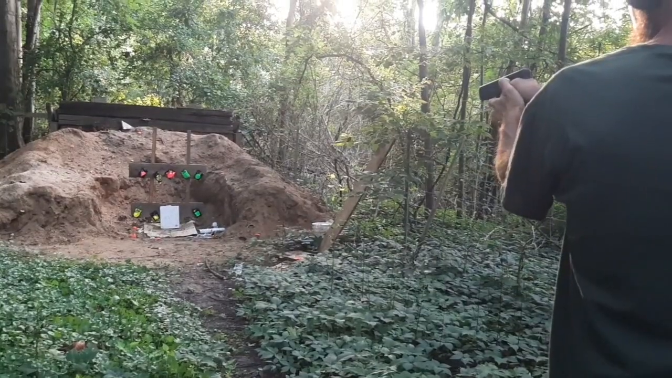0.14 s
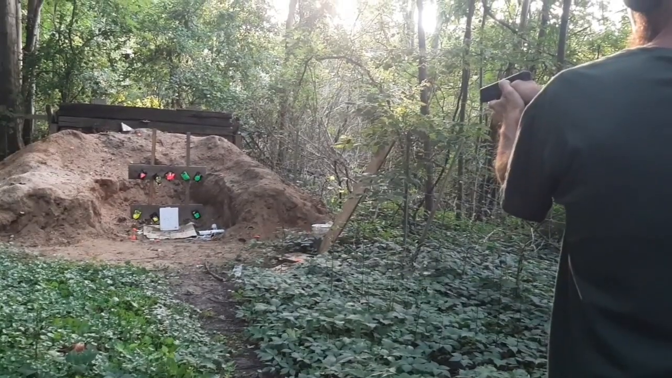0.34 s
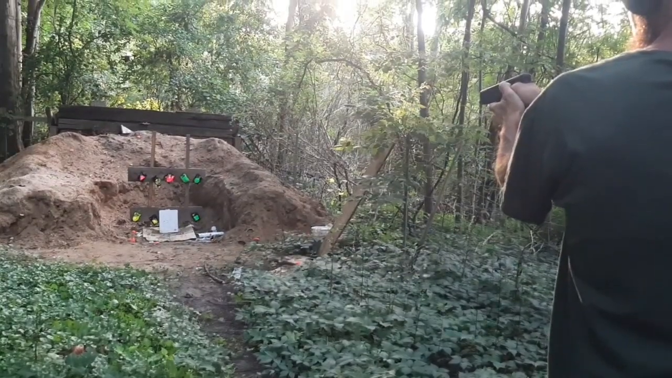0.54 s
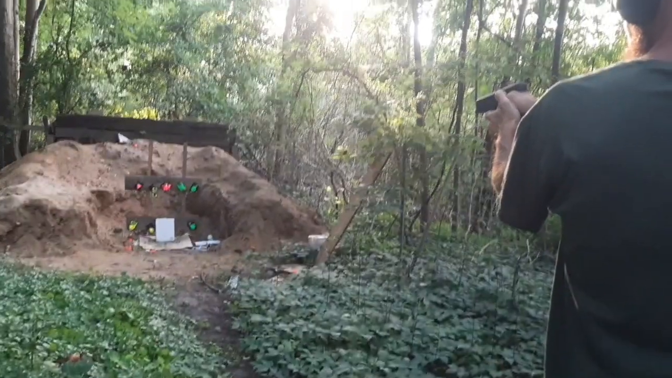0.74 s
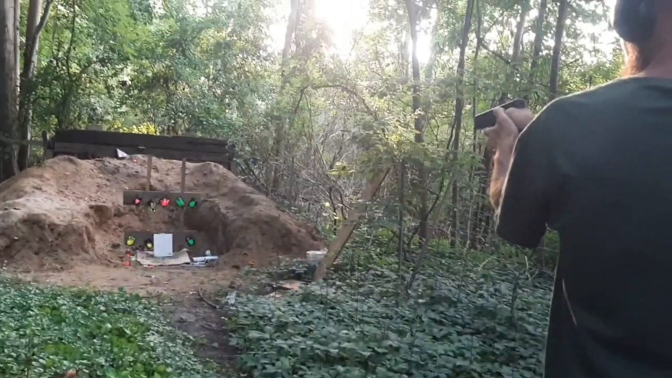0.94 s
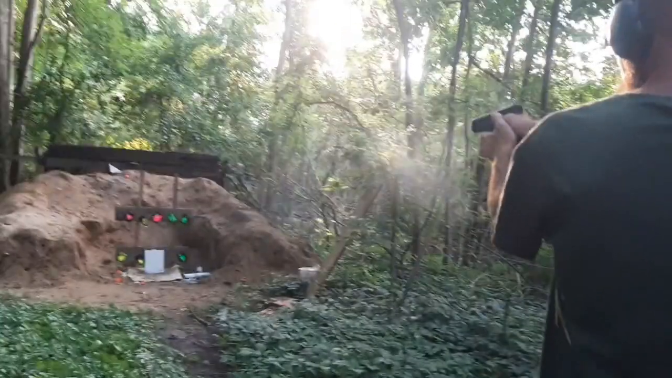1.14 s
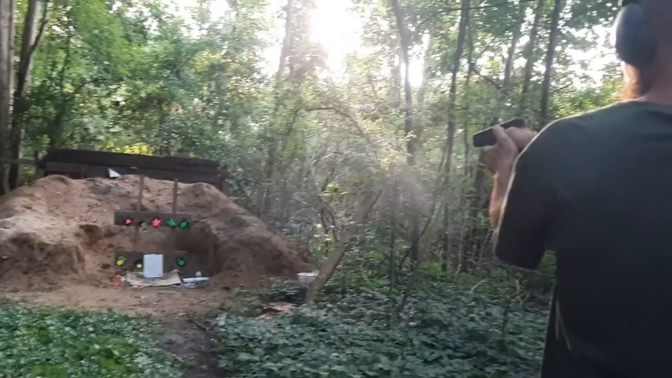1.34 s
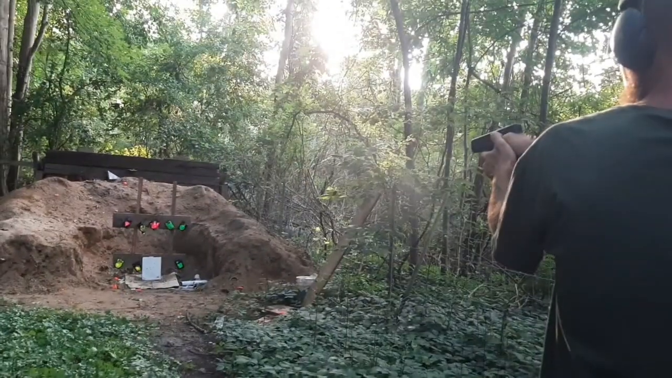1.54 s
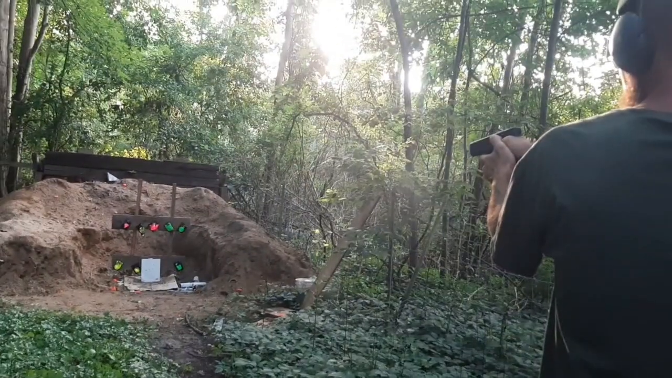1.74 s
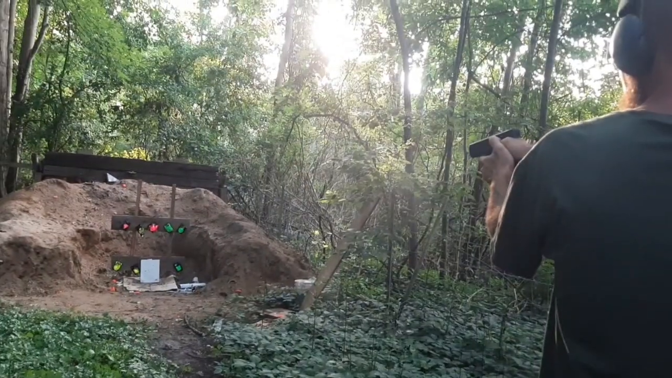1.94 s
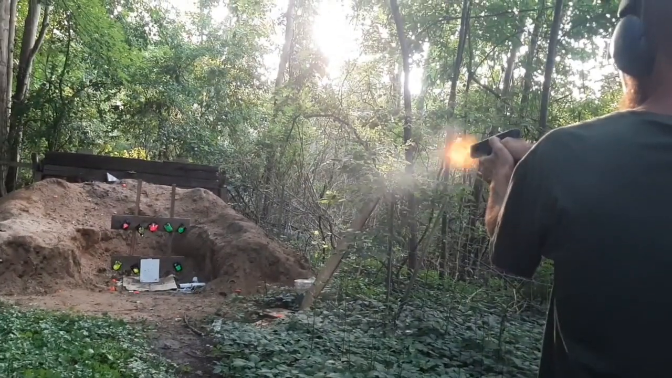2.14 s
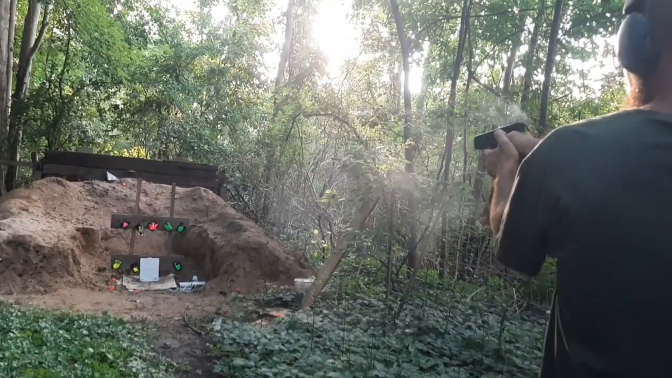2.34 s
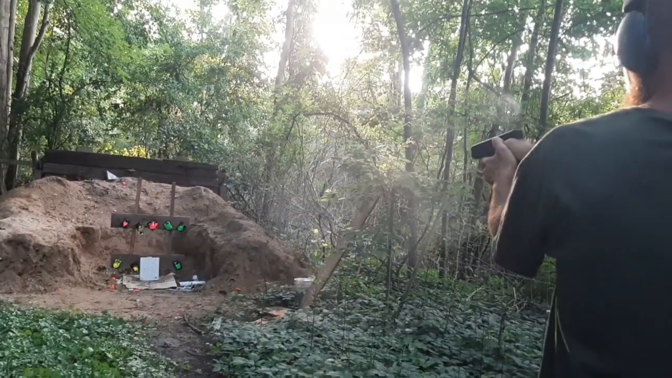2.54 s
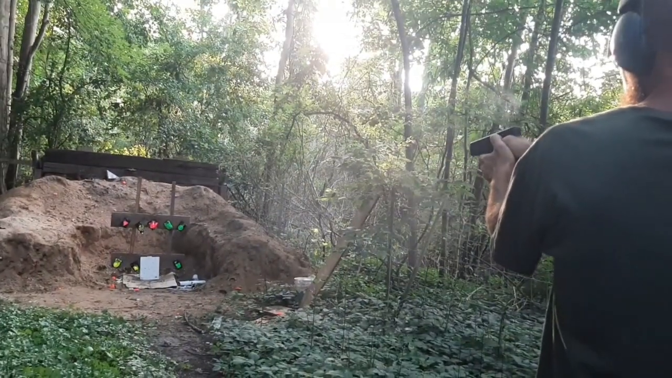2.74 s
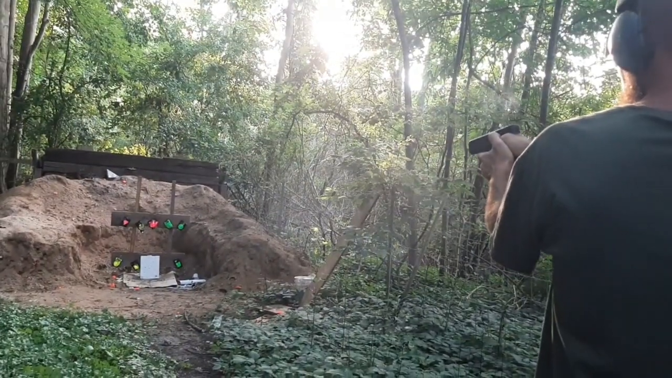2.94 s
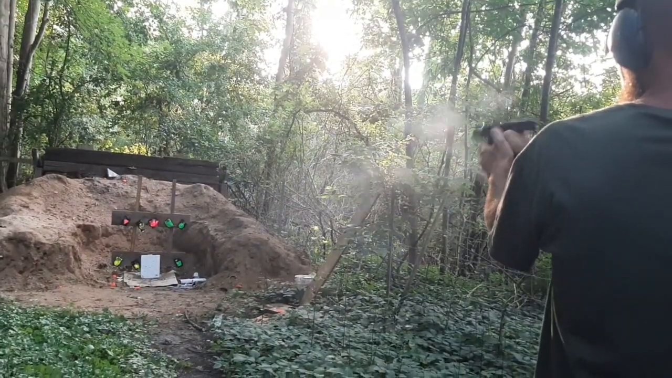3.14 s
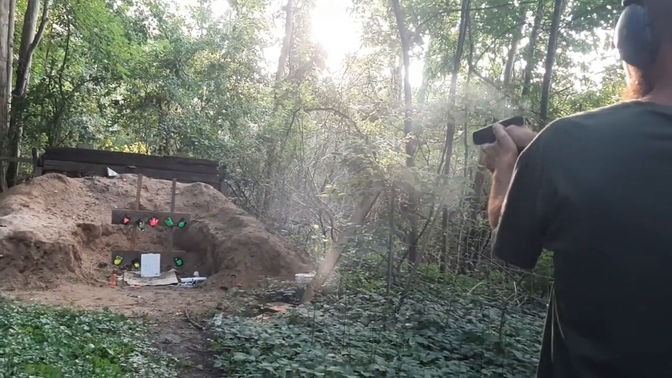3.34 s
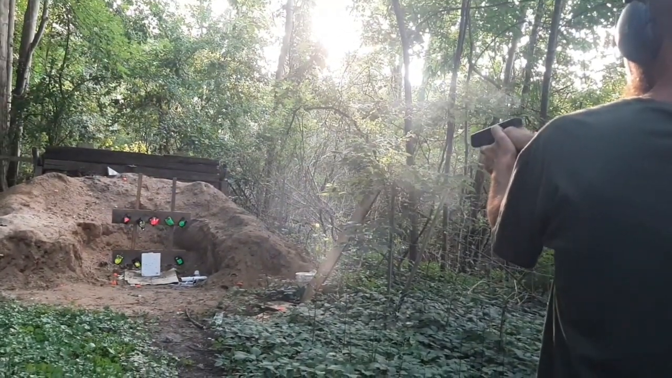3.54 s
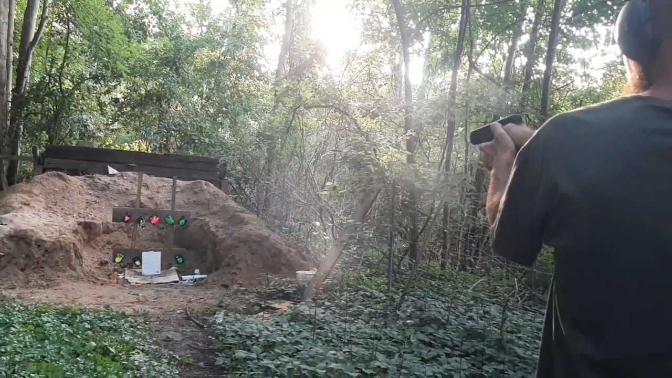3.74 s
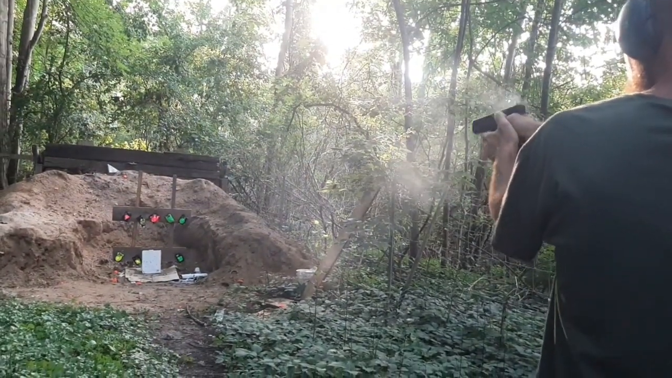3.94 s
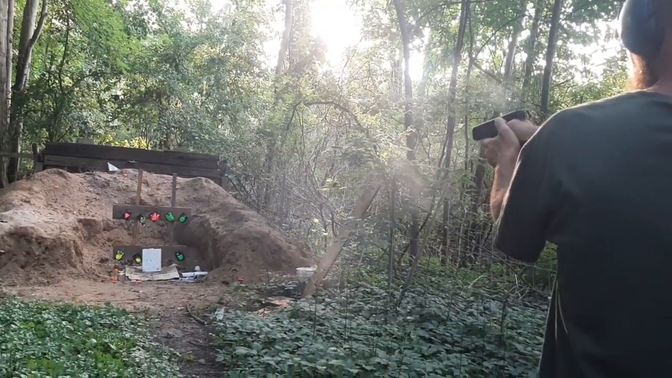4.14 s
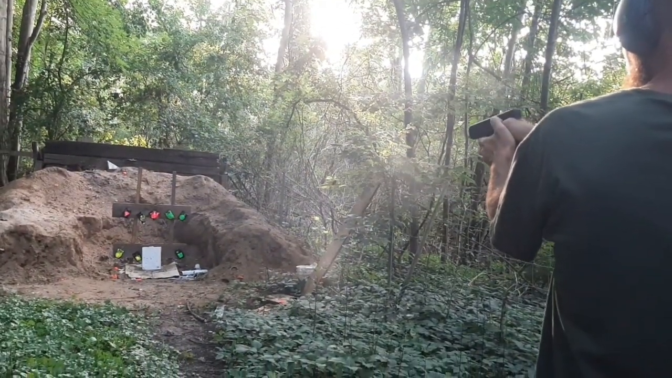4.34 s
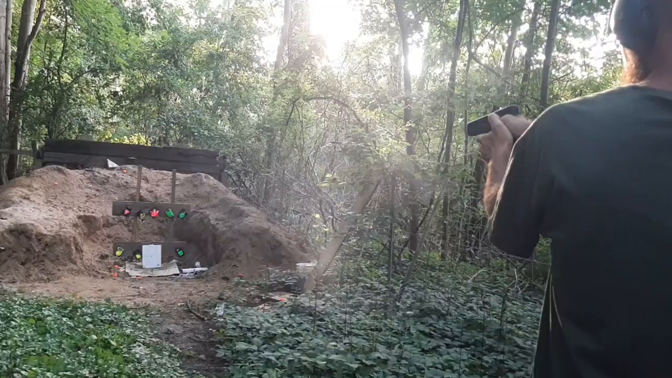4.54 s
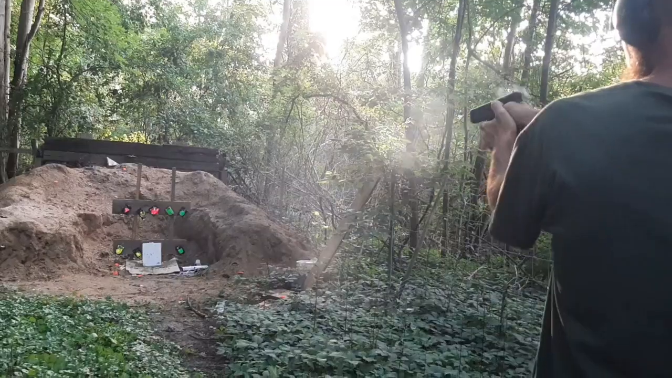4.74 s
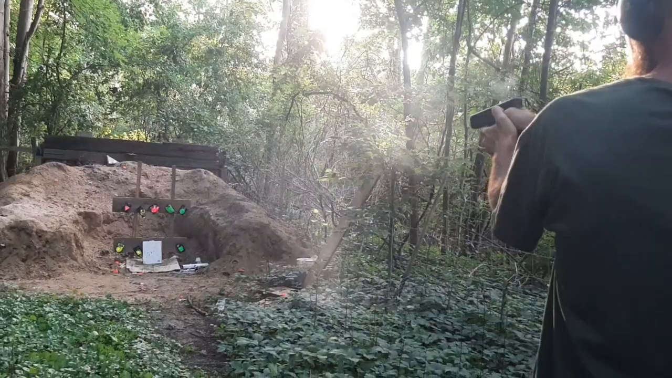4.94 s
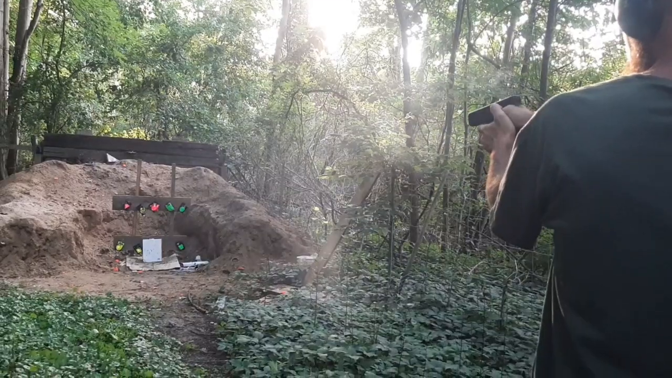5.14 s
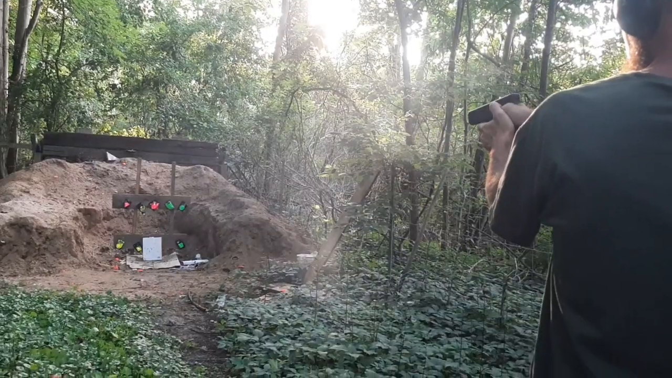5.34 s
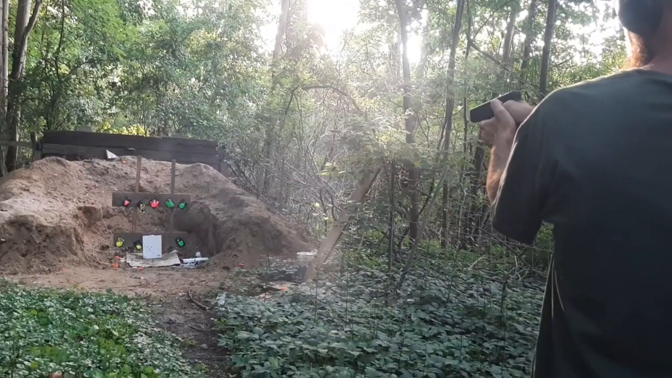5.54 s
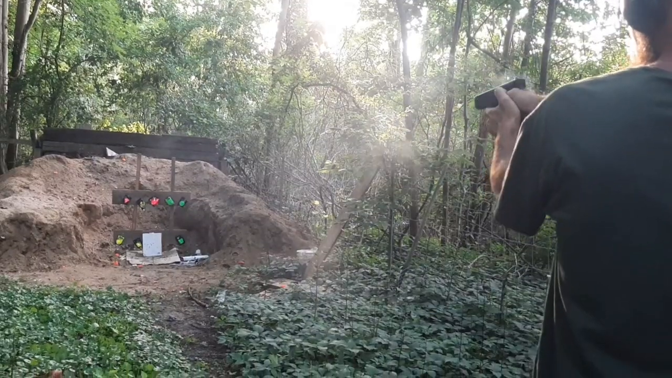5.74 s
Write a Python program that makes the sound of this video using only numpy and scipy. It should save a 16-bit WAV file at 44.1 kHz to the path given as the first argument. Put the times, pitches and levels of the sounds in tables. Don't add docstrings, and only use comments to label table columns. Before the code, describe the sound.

Six loud pistol shots at a steady pace in a wood, each clipped crack followed by a rolling echo, over faint throbbing traffic.

```python
import sys
import numpy as np
from scipy import signal
from scipy.fft import rfft, irfft, next_fast_len
from scipy.io import wavfile
from scipy.ndimage import uniform_filter1d

SR = 44100
rng = np.random.default_rng(int(sys.argv[2]) if len(sys.argv) > 2 else 0)


def nominal_scale(level):
    x = np.asarray(level, float) / 20
    return 10 ** x


def store_wav(level_fs):
    pcm = np.round(np.clip(np.atleast_2d(level_fs), -1, 1) * 32767)
    wavfile.write(sys.argv[1], SR, pcm.T.astype(np.int16))


N = 254898

# freq_hz, density_db (per Hz)
TRAFFIC_COLOUR = [(25, -17), (64, 1.5), (200, -18), (330, -17.5), (480, -15), (950, -17.5), (1300, -21.5),
                  (1750, -25), (2080, -22), (2500, -30.5), (5000, -40), (7400, -45), (8500, -62),
                  (15500, -68)]
# freq_hz, width_hz, boost_db (over the traffic)
MOTOR_HUM = [(335, 14, 6), (478, 16, 7), (690, 16, 5), (855, 14, 6), (955, 16, 7), (1530, 20, 5),
             (2060, 90, 3)]
# peak_s, swell_db, length_s
VEHICLE_PASSES = [
    (.12, 5, 0.21),
    (.9, 5, 0.54),
    (1.616, 2.5, 0.12),
    (2.8, 3.5, 0.17),
    (3.399, 2.5, .15),
    (4.094, 0.5, .15),
    (4.855, 3, .1),
    (5.254, 2.5, .3),
]
# peak_s, length_s, pitch_hz, level_db
ENGINE_DRONES = [
    (5.403, 0.24, 100.5, -44.5),
]
# start_s, level_db, pitch_hz, t60_s
CASE_RINGS = [
    (1.751, -63, 10600, .25),
    (1.988, -76, 10700, .25),
    (1.999, -78, 11500, .1),
    (2.03, -80, 10700, .2),
    (3.008, -62, 4600, .04),
]
# start_s, level_db, centre_hz
LEAF_RUSTLES = [(.7916, -20, 1800), (1.751, -70, 11000), (1.988, -47, 5200), (1.999, -61, 11500),
                (2.03, -67, 13000), (2.887, -68, 11000), (3.006, -61, 11000), (3.008, -58, 4600),
                (5.33, -68, 13500), (5.35, -68, 13500), (5.395, -68, 11000)]
# start_s, level_db, overshoot_db (of the gain control)
PISTOL_SHOTS = [
    (1.0056, 0, -7),
    (2.139, 0.5, -4.5),
    (3.1154, 0, -4.5),
    (3.8559, 0, -3),
    (4.638, 0, -4),
    (5.6235, 0, -3.5),
]
# freq_hz, density_db (per Hz)
ECHO_COLOUR = [(30, -25), (65, -8), (368, -8), (1000, -4), (1490, -4.5), (1750, -6), (2100, -3.5),
               (3500, -5), (6050, -2), (7470, -5), (8600, -9.5), (10500, -8.5), (15500, -5), (16500, -8)]
# freq_hz, left_minus_right_db
ECHO_LEAN = [(60, -14.5), (110, 6.5), (200, 1.5), (380, 3.5), (700, 2), (1290, 1.5), (2380, 1), (4400, -4),
             (8120, 5), (15000, 1)]
# freq_hz, correlation (-1 to 1)
ECHO_LIKENESS = [(50, -0.22), (130, -0.28), (260, 1), (600, 0.55), (1200, -0.014)]
# freq_hz, t60_s
ECHO_T60 = [(60, 0.6), (150, 0.71), (300, 1.06), (500, 1.54), (1000, 1.415), (2100, 1.138), (3500, 1.063),
            (6000, 1.036), (9000, 0.87), (14000, 0.45)]
# freq_hz, swell_db (over the trunks)
BANK_SWELL = [(60, 18), (170, 11.5), (400, 8), (1000, 6.5), (2500, 4), (6000, -1.5)]
# delay_s, spread_s, centre_hz, left_db, right_db
TREE_STANDS = [(0.32, 0.091, 397, 6, 8), (.07, 0.054, 1485, 3, 2.5), (.11, 0.05, 1100, -0.5, 5),
               (.11, 0.019, 2100, -1, -0.5), (0.27, 0.0096, 900, 17, 13), (0.305, 0.0062, 1740, 12, 9),
               (0.34, 0.042, 1060, 4, 6), (0.37, 0.013, 1900, 7.5, 4), (.42, .03, 780, 0, 3),
               (0.49, 0.025, 2730, 3, 6), (.55, 0.097, 320, 8, 11.5), (0.66, 0.049, 1200, 8, 9.5),
               (0.2, 0.044, 420, 4, 6.5), (0.089, 0.03, 280, 5, -2)]
# freq_hz, width_hz, gain_db_per_s, left_minus_right_db_per_s
LINGERING_BANDS = [(380, 90, 6, 0), (600, 90, 5, 0), (950, 350, 4, 0), (1700, 200, -12, 0),
                   (2140, 220, 11, 8), (12000, 3000, 0, 8), (15650, 450, -60, 0)]

TRAFFIC_DB, INSECT_HZ, INSECT_DB, HISS_DB = -26, 6500, -62, -79
BETWEEN_PASSES_DB, THROB_DB = -1.5, 1.5
FADING_DB_S = 2.5
TREBLE_FROM_DB, TREBLE_SINK_DB_S = 11, 15
CUT_HZ, CUT_DB = 223, -4
DUCK_DB, RECOVER_DB_S = -15, 2.5
RUSTLE_T60_S = 0.06
ECHO_SAMPLES = 57344
BANK_DELAY_S, BANK_SPREAD_S, BANK_SHARE = (0.068, 0.021), (0.039, 0.036), (1.09, 0.76)
OVERLOAD_S, STILL_HZ = (0.1, 0.045), 8500
STAND_OCTAVES = 0.29
LEAK_DB, SHUT_S = 8.5, 0.0037
REOPEN_DB, REOPEN_S, SETTLE_S = 9, 0.042, 0.1
THROUGH_DB, SAG_DB_S = 3, 3
BLAST_LOBE_S, BLAST_DB, BLAST_T60_S = 0.0017, -8, 0.034
LOW_HZ, TOP_HZ = 38, 15650
NOTCH_HZ, NOTCH_WIDTH_HZ = 8600, 1200


def read(table, hz):
    freq, value = np.transpose(table)
    return np.interp(np.log(np.maximum(hz, 1)), np.log(freq), value)


def level(x, db):
    return x * nominal_scale(db) / np.sqrt(np.mean(x ** 2))


def bell(x, centre, width):
    return np.exp(-((x - centre) / width) ** 2)


def bands(size, step=0.4):
    octave = np.log2(np.maximum(np.arange(size // 2 + 1) * SR / size, 1))
    return [(2 ** c, np.clip(1 - abs(octave - c) / step, 0, 1)) for c in np.arange(4.5, 15, step)]


def walk(rate):
    k = int(SR / rate)
    held = np.repeat(rng.standard_normal(N // k + 1), k)
    return uniform_filter1d(uniform_filter1d(held, k), k)[:N]


def add(out, s, x):
    i = int(s * SR)
    out[:, i:i + x.shape[1]] += x[:, :N - i]


def hiss():
    return nominal_scale(HISS_DB) * rng.standard_normal((2, N))


def insects():
    size = next_fast_len(N)
    hz = np.arange(size // 2 + 1) * SR / size
    spectrum = rfft(rng.standard_normal((2, size))) * bell(hz, INSECT_HZ, 300)
    chorus = irfft(spectrum, size)[:, :N]
    return level(chorus * nominal_scale(3.0 * walk(12)), INSECT_DB)


def traffic():
    size = next_fast_len(N)
    hz = np.arange(size // 2 + 1) * SR / size
    hum_db = sum(db * bell(hz, f, width) for f, width, db in MOTOR_HUM)
    mid, side = rfft(rng.standard_normal((2, size))) * nominal_scale(read(TRAFFIC_COLOUR, hz) + hum_db)
    pair = mid + np.clip(hz / 120, 0.3, 1) * side * np.array([[1], [-1]])
    t = np.arange(N) / SR
    bass_db = BETWEEN_PASSES_DB + sum(db * bell(t, s, length) for s, db, length in VEHICLE_PASSES)
    treble_db = FADING_DB_S * (0.5 - t)
    for s, *_ in PISTOL_SHOTS:
        treble_db = np.where(t >= s, TREBLE_FROM_DB - TREBLE_SINK_DB_S * (t - s), treble_db)
    after_first = t > PISTOL_SHOTS[0][0]
    out = 0
    for centre, weight in bands(size, step=0.875):
        high = np.clip(np.log2(centre / 200) / 2, 0, 1)
        cut_db = CUT_DB * np.exp(-np.log2(centre / CUT_HZ) ** 2 * 2) * after_first
        drift_db = (THROB_DB * (1 - high) + 1.03) * walk(12)
        gain_db = cut_db + (1 - high) * bass_db + high * treble_db + drift_db
        out = out + nominal_scale(gain_db) * irfft(pair * weight, size)[:, :N]
    return level(out * nominal_scale([[0.9], [-0.9]]), TRAFFIC_DB)


def engine_drones():
    t = np.arange(N) / SR
    return sum(nominal_scale(db) * np.exp(-((t - s) / length) ** 4) * np.sin(2 * np.pi * hz * t)
               for s, length, hz, db in ENGINE_DRONES)


def rustling_leaves():
    out, t = np.zeros((2, N)), np.arange(16384) / SR
    for s, db, hz in LEAF_RUSTLES:
        leaf = signal.butter(2, [hz / 1.6, min(hz * 1.3, 18000)], "band", fs=SR, output="sos")
        burst = signal.sosfilt(leaf, rng.standard_normal((2, len(t))))
        add(out, s, burst * nominal_scale(db - 60 * t / RUSTLE_T60_S))
    return out


def ringing_cases():
    out, t = np.zeros((2, N)), np.arange(16384) / SR
    for s, db, hz, t60 in CASE_RINGS:
        beat = 1 + 0.6 * np.cos(2 * np.pi * 55 * t)
        ring = nominal_scale(db - 60 * t / t60) * np.sin(2 * np.pi * hz * t) * beat
        add(out, s, np.array([ring, ring]))
    return out


def trunks(t, spiky_db, plus):
    size = nominal_scale(spiky_db * np.exp(-t / 0.19) * rng.exponential(size=t.shape))
    sign = np.where(rng.random(t.shape) < plus, 1., -1.)
    clicks = size * sign * abs(rng.standard_normal(t.shape))
    return clicks / np.sqrt(uniform_filter1d(clicks ** 2, size=1024))


def wood(t):
    return np.array([trunks(t, 5.7, 0.8), trunks(t, 1.2, 0.45)])


def wood_at_ports(t, hz, standing):
    upset = 0.7 * np.exp(-(t / np.c_[list(OVERLOAD_S)]) ** 2)
    still = np.exp(-hz / STILL_HZ)
    steady = rfft(np.sqrt(1 - upset) * standing + np.sqrt(upset) * wood(t))
    left, right = np.sqrt(still) * steady + np.sqrt(1 - still) * rfft(wood(t))
    alike = np.clip(read(ECHO_LIKENESS, hz), -0.9, 0.9)
    pair = np.array([left, alike * left + np.sqrt(1 - alike ** 2) * right])
    colour = nominal_scale(read(ECHO_COLOUR, hz) + np.array([[0.5], [-0.5]]) * read(ECHO_LEAN, hz))
    return pair * colour / np.sqrt(np.mean(colour ** 2))


def echoes(t, standing):
    hz = np.arange(ECHO_SAMPLES // 2 + 1) * SR / ECHO_SAMPLES
    answer = wood_at_ports(t, hz, standing)
    bank = np.c_[list(BANK_SHARE)] * bell(t, np.c_[list(BANK_DELAY_S)], np.c_[list(BANK_SPREAD_S)])
    delay, spread, stand_hz, *port_db = np.transpose(TREE_STANDS)
    stands = bell(t, delay[:, None], spread[:, None])
    out = 0
    for centre, weight in bands(ECHO_SAMPLES):
        fade_db = -60 * t / read(ECHO_T60, centre) + read(BANK_SWELL, centre) * bank
        near_pitch = np.exp(-(np.log2(centre / stand_hz) / STAND_OCTAVES) ** 2)
        fade_db += (port_db * near_pitch) @ stands
        out = out + nominal_scale(fade_db) * irfft(answer * weight)
    onset = np.minimum(np.array([[250], [700]]) * t + 0.22, 1)
    ending = np.minimum(10 * (t[-1] - t), 1)
    out = out * onset * ending
    spectrum = rfft(out)
    for f, width, gain_db, lean_db in LINGERING_BANDS:
        slope_db = gain_db + np.c_[[0.5, -0.5]] * lean_db
        out = out + (nominal_scale(slope_db * t) - 1) * irfft(spectrum * bell(hz, f, width))
    return out * ending


def limiter_gain(t, overshoot_db):
    reopen = (1 - np.exp(-t / REOPEN_S)) * np.exp(-t / SETTLE_S)
    through_db = THROUGH_DB - SAG_DB_S * t + LEAK_DB * np.exp(-t / SHUT_S)
    through_db += REOPEN_DB * reopen - 2 * np.exp(-t / REOPEN_S)
    clamp_db = overshoot_db * (1 - np.exp(-t / 0.0051)) * bell(t, 0, 0.062)
    return nominal_scale(-10.5 + through_db + clamp_db)


def muzzle_blast(t):
    lobes = -np.sin(np.pi * (t / BLAST_LOBE_S) ** 0.6)
    right = 0.49 * np.sin(2 * np.pi * 620 * t) - 0.24 * lobes
    return np.array([lobes, right]) * nominal_scale(BLAST_DB - 60 * t / BLAST_T60_S)


def shot(db, overshoot_db, standing):
    t = np.arange(ECHO_SAMPLES) / SR
    return nominal_scale(db) * (limiter_gain(t, overshoot_db) * echoes(t, standing) + muzzle_blast(t))


def scene():
    t, duck_db = np.arange(N) / SR, np.zeros(N)
    out = rustling_leaves() + ringing_cases()
    standing = wood(t[:ECHO_SAMPLES])
    for s, db, overshoot_db in PISTOL_SHOTS:
        duck_db = np.where(t >= s, DUCK_DB + RECOVER_DB_S * (t - s), duck_db)
        add(out, s, shot(db, overshoot_db, standing))
    return out + nominal_scale(duck_db) * (traffic() + insects()) + engine_drones() + hiss()


def band_limit(x):
    return signal.sosfilt(signal.butter(12, 16820, fs=SR, output="sos"), x)


def record(dry):
    low = signal.butter(2, LOW_HZ, "high", fs=SR, output="sos")
    top = signal.ellip(12, 0.3, 60, TOP_HZ, fs=SR, output="sos")
    port = signal.tf2sos(*signal.iirnotch(NOTCH_HZ, NOTCH_HZ / NOTCH_WIDTH_HZ, SR))
    rounded = np.tanh(1.05 * dry) * 0.93
    notched = 0.2 * rounded + 0.8 * signal.sosfilt(port, rounded)
    mix = signal.sosfilt(np.vstack([low, top]), notched)
    return band_limit(mix)


dry = scene()
out = record(dry)
store_wav(out)
```